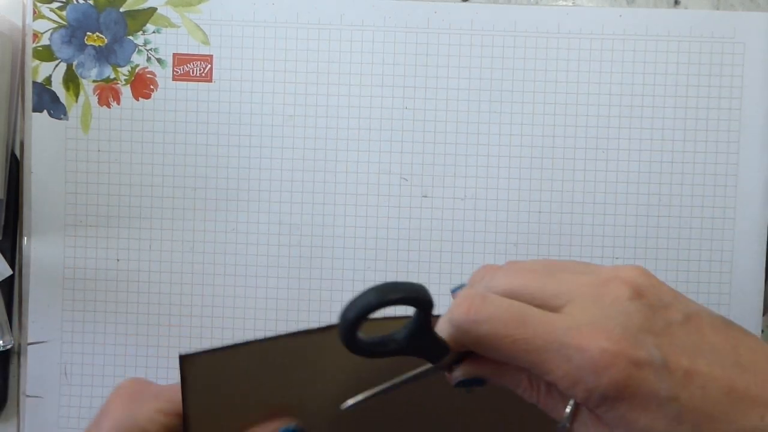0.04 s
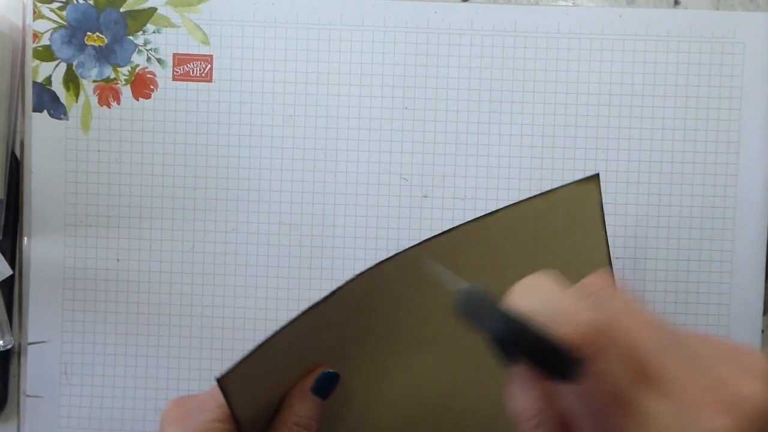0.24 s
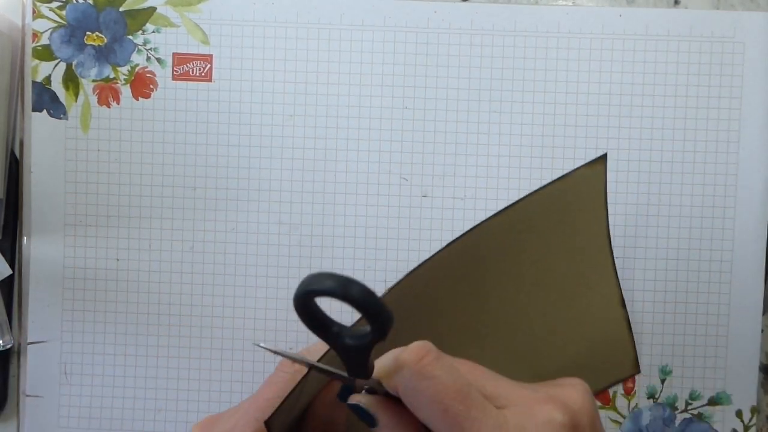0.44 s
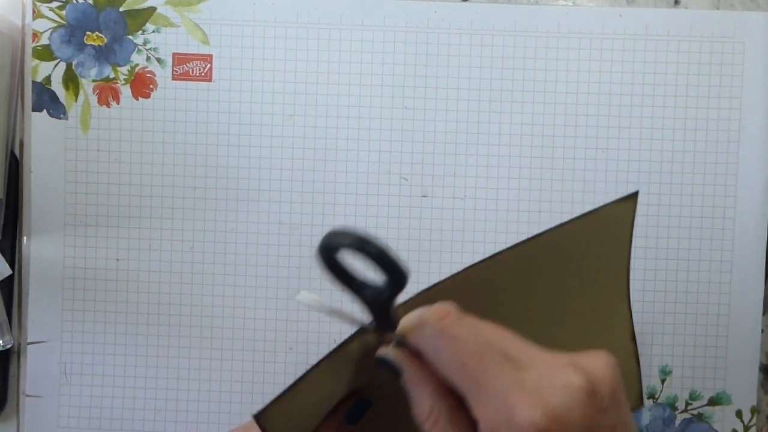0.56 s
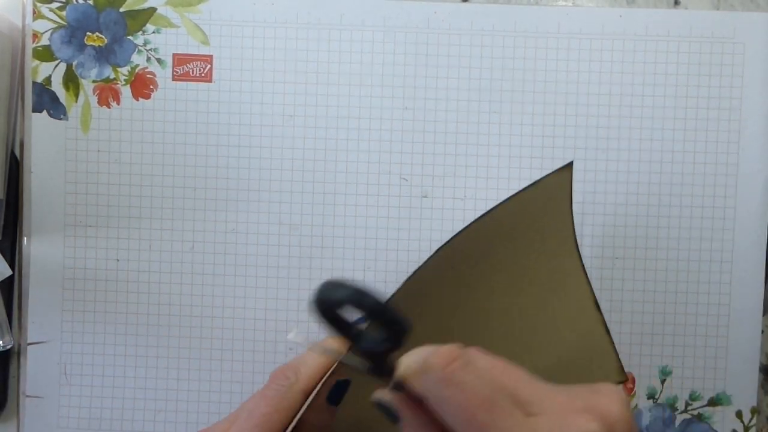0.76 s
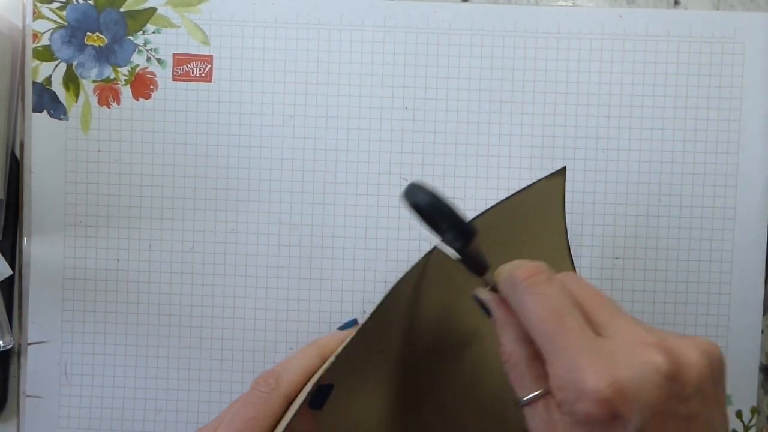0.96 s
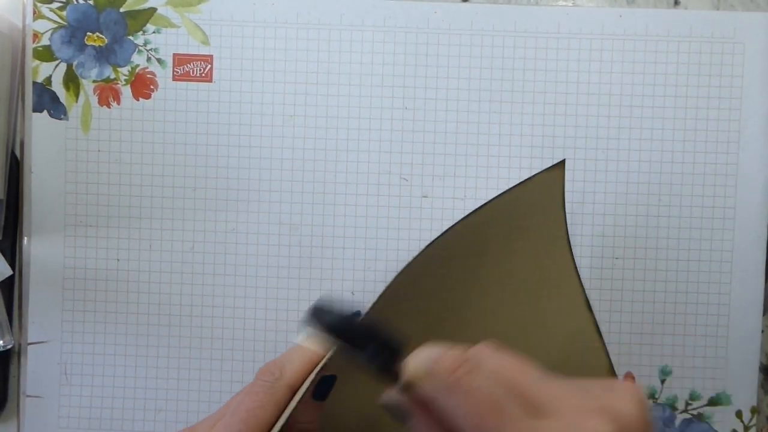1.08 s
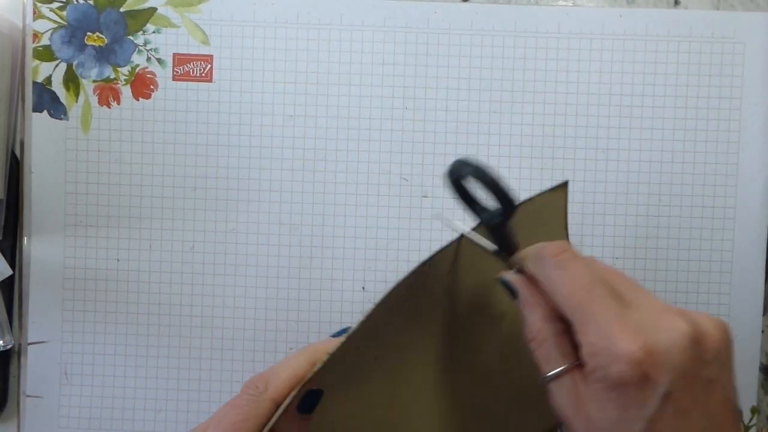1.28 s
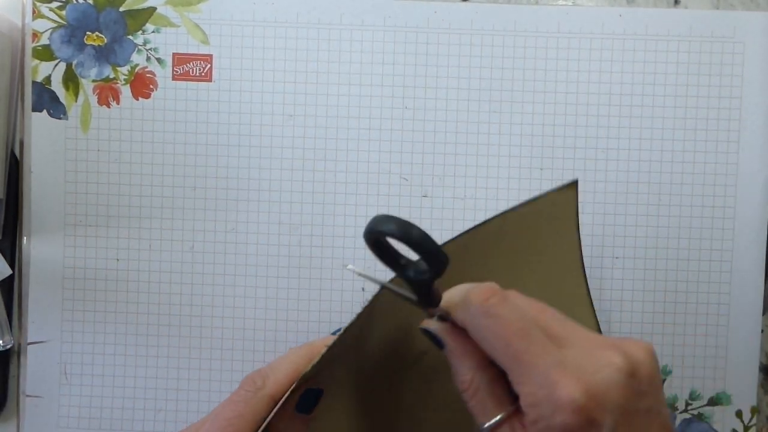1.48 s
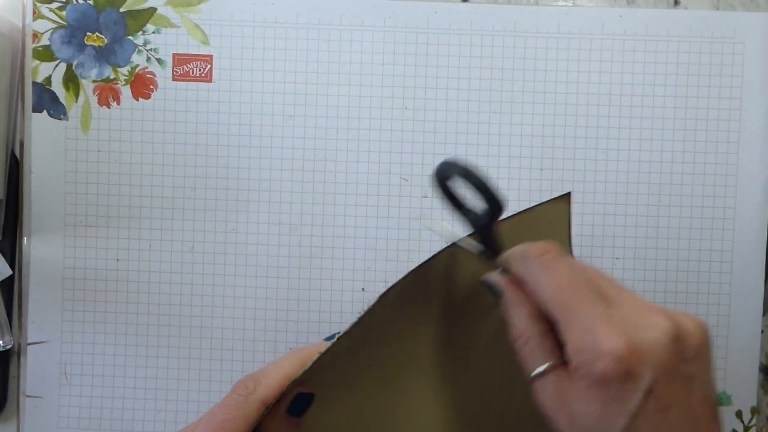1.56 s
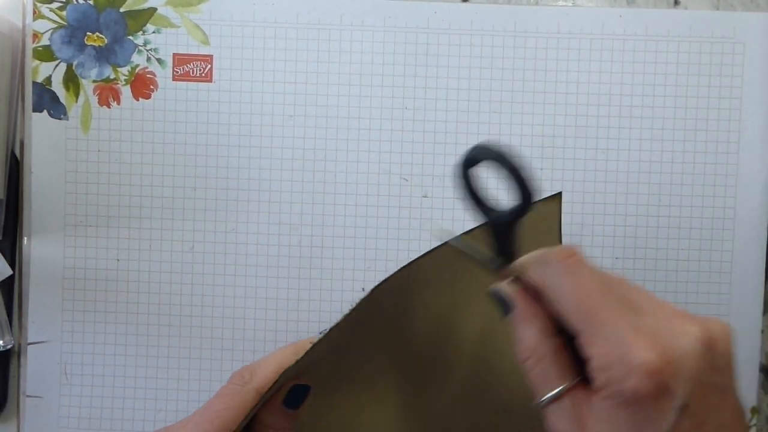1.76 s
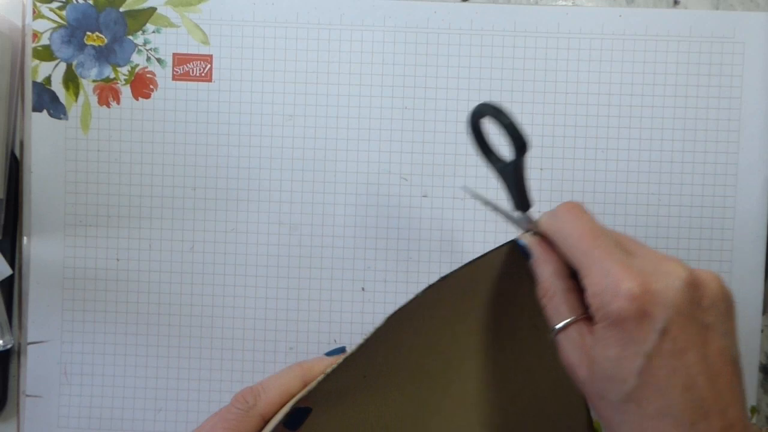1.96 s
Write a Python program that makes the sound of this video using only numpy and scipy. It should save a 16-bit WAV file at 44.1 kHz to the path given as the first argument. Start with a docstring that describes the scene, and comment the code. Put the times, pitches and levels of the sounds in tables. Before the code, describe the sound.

Raspy scrapes of a metal blade along a thick paper edge, with small knocks and faint rustling

```python
"""In a small quiet room, a sheet of cardstock rustles as it is turned in the hand, close above a desk.
Light brushes and knocks sound on it, and an open scissor blade skims its edge once.
Then come four firm strokes, about three a second, each just after a knock of the blade on the edge.
Random clicks stand for catching fibres: they hiss, and they drive resonances that are the ringing sheet.
Echoes off the desk, a short room tail and faint air noise surround it all."""
import sys
import numpy as np
from scipy import signal
from scipy.fft import rfft, irfft, next_fast_len
from scipy.io import wavfile

SR = 44100
rng = np.random.default_rng(int(sys.argv[2]) if len(sys.argv) > 2 else 0)


def dump_mix(stems):
    """Bounce the given channels to the path in sys.argv[1] as a 16-bit WAV at rate SR."""
    frames = np.atleast_2d(stems).T  # one column per channel
    limited = np.clip(frames, -1, 1)  # hard clip at full scale
    pcm = np.round(limited * 32767).astype(np.int16)
    wavfile.write(sys.argv[1], SR, pcm)


N = 89126
TIME = np.arange(N) / SR   # seconds
SIZE = next_fast_len(2 * N)   # room for filters to ring on
FREQS = np.maximum(np.arange(SIZE // 2 + 1) * SR / SIZE, 1)   # Hz

TOUCH_ARCH = 1.207   # steepness of the swell of strokes, brushes and snags
BLADE_HZ = 6500   # the steel blade's own note
LEFT_RIGHT = np.array([[1], [-1]])

# Tone of the rasping paper edge. Each row: frequency in Hz, relative level in dB per Hz.
RASP_TONE = [(60, -6), (130, -32), (190, -10), (260, -20), (420, -6), (670, -12), (800, 3), (1250, 1),
             (1900, -2.5), (2450, -3), (2950, -6), (3500, -6.5), (5000, -13.5), (9000, -37)]


def from_db(db):
    """Turn decibels into a gain."""
    return 10 ** (np.asarray(db) / 20)


def rms_one(x):
    """Scale to an average power of one."""
    return x / np.sqrt(np.mean(np.abs(x) ** 2) + 1e-20)


def colour(points):
    """Make a filter through (Hz, dB) points that never sounds before its input (minimum phase)."""
    hz, db = np.transpose(points)
    level_db = np.interp(np.log(FREQS), np.log(hz), db)
    cepstrum = irfft(np.log(from_db(level_db)), SIZE)
    # folding the second half onto the first makes the filter causal
    cepstrum[1:SIZE // 2] *= 2
    cepstrum[SIZE // 2 + 1:] = 0
    return np.exp(rfft(cepstrum))


def through(x, response):
    """Filter a sound by a frequency response."""
    return irfft(rfft(x, SIZE) * response, SIZE)[..., :N]


def butter(x, order, hz, kind="low"):
    """Cut the sound above hz, or below it for kind "high"."""
    return signal.sosfilt(signal.butter(order, hz, kind, fs=SR, output="sos"), x)


def resonance(hz, width_hz):
    """Response of one damped way of vibrating (a mode), with gain 1 at its peak."""
    return 1 / (1 + 1j * (FREQS ** 2 - hz ** 2) / (FREQS * width_hz))


def drift(hz):
    """Random wandering slower than about hz, with spread 1."""
    return rms_one(butter(rng.standard_normal(N), 2, hz))


def swell(start, crest, end, steepness):
    """An arch in time that rises from start to crest and falls to the end."""
    ramp = np.interp(TIME, [start, crest, end], [0, 1, 0])
    return np.sin(np.pi / 2 * ramp) ** steepness


def catches(per_s=5000):
    """Fibres catch and snap at random, in clumps: clicks for the middle (mid) and the width (side)."""
    spread_db = 1.5
    judder_hz, judder_db = 73, 0.99   # the blade's uneven grip
    sizes = from_db(spread_db * np.minimum(rng.exponential(1, (2, N)), 4))
    signs = rng.choice([-1, 1], (2, N))
    happens = rng.random((2, N)) < per_s / SR
    grip = from_db(judder_db * drift(judder_hz))
    return rms_one(sizes * signs * happens * grip)


def sheet(pitch):
    """The sheet's modes ring together; bending shifts them all by the ratio pitch."""
    # Each row: frequency in Hz at pitch 1, width in Hz, relative level in dB.
    sheet_modes = [(360, 23, -34), (452, 22, -5), (480, 55, 4.5), (605, 72, 2), (774, 38, 5.5),
                   (855, 69, 7), (966.5, 31, 5.5), (1135, 72, 3.5), (1201, 30, 4), (1352, 32, 7),
                   (1474, 23, 0.5), (1683, 37, -7), (1920, 87, -3.5), (2172, 43, -1.5), (2230, 21, -19),
                   (2463, 51, -7.5)]
    return rms_one(sum(from_db(db) * resonance(hz * pitch, width) for hz, width, db in sheet_modes))


def fibre_hiss():
    """Tone of snapping fibres, with the steel blade's own note added."""
    # Each row: frequency in Hz, relative level in dB per Hz.
    hiss_tone = [(400, -25), (1500, -27), (3000, 1.5), (4200, 2), (5500, -2.5), (6700, -2.5), (7600, -5),
                 (10500, 0.5), (12000, -2.5), (13200, -6), (14500, -33)]
    blade_db, blade_width_hz = 2.5, 180
    blade_note = from_db(blade_db) * resonance(BLADE_HZ, blade_width_hz)
    return rms_one(colour(hiss_tone) * (1 + blade_note))


def sliding():
    """At first the sheet rustles as it turns; later the steel sings and the sheet murmurs."""
    # A dull rustle while the sheet is turned: start, crest and end in seconds, level in dB.
    turn = (-0.02, 0.02, 0.7, -46)
    # Tone of the rustle. Each row: frequency in Hz, relative level in dB per Hz.
    rustle_tone = [(100, 1.5), (260, 7.5), (400, -3.5), (620, 4.5), (1200, -7.5), (1950, -1.5), (2500, -14),
                   (6000, -22), (11000, -17.5), (14000, -15)]
    # The blade slides back to the start of a stroke, or settles after one.
    # Each row: start, crest and end in seconds, blade level in dB, sheet level in dB.
    # A row that ends before it starts stays silent.
    returns = [(0.7, 0.75, 0.84, -48.5, -38.5), (0.825, 0.885, 0.96, -50.5, -56),
               (1.063, 1.073, 1.16, -57, -42), (1.15, 1.166, 1.24, -54.5, -60.5),
               (1.393, 1.428, 1.471, -55.5, -41), (1.75, 1.76, 1.67, -48, -41)]
    sing_width_hz = 1500
    turning = from_db(turn[3]) * swell(*turn[:3], 0.74)
    steel = sum(from_db(db) * swell(start, crest, end, 0.73) for start, crest, end, db, _ in returns)
    paper = sum(from_db(db) * swell(start, crest, end, 1) for start, crest, end, _, db in returns)
    rustle = through(turning * catches(), rms_one(colour(rustle_tone)))
    singing = through(steel * catches(), rms_one(resonance(BLADE_HZ, sing_width_hz)))
    murmur = through(paper * catches(), sheet(1))
    return rustle + singing + murmur


def brushing():
    """Light contact only rasps and hisses; brushes with few catches break up into single ticks."""
    # Light brushes of blade or fingers over the paper.
    # Each row: start, crest and end in seconds, rasp level in dB, hiss level in dB, catches per second.
    brushes = [(0, .11, 0.57, -52, -53, 1770), (0.03, 0.067, 0.087, -39, -47, 920),
               (0.15, 0.206, 0.23, -37.5, -46.5, 740), (0.484, 0.496, 0.55, -48, -46, 2550),
               (0.556, 0.561, 0.606, -41, -50, 1830), (0.586, 0.655, 0.748, -33.5, -27.5, 8000),
               (0.685, 0.687, 0.72, -31.5, -21, 2000), (1.229, 1.263, 1.275, -32, -33.5, 5100)]
    # Hiss of a light touch. Each row: frequency in Hz, relative level in dB per Hz.
    skim_tone = [(150, -26), (380, 0.5), (650, -17), (1500, -16), (3500, -1), (5500, -1), (6800, 0.5),
                 (7600, -1.5), (10500, 0.5), (12000, -2.5), (13300, -3), (14500, -18)]
    rasp = hiss = 0
    for start, crest, end, rasp_db, hiss_db, per_s in brushes:
        clicks = swell(start, crest, end, TOUCH_ARCH) * catches(per_s)
        rasp = rasp + from_db(rasp_db) * clicks
        hiss = hiss + from_db(hiss_db) * clicks
    rasp = rasp * rng.choice([-1, 1], N)   # random signs, so rasp and hiss do not match click for click
    return through(rasp, rms_one(colour(RASP_TONE))) + through(hiss, rms_one(colour(skim_tone)))


def knocks(hiss_colour):
    """A soft push and a short flutter drive the sheet, with a small bright tick."""
    # Blade or fingers knock on the sheet.
    # Each row: time in seconds, relative level in dB, softness as a cut-off in Hz, relative tick level in dB.
    knock_list = [(.017, -19, 2510, -19.5), (.084, -8, 590, -47), (0.145, -5, 1800, -6),
                  (.175, -11, 2500, -8), (.320, -29, 1980, -27), (0.456, -18, 1490, -26),
                  (0.495, -16.5, 818, -16), (0.565, -22.5, 3000, -14.5), (.760, 5.5, 1940, -19),
                  (.895, -12, 2210, -12), (1.211, -10, 2600, -16), (1.552, 3.5, 1360, -18),
                  (1.914, 8.5, 1060, -14.5), (1.934, 3, 1940, -11)]
    # Tone of the thud. Each row: frequency in Hz, relative level in dB per Hz.
    thud_tone = [(50, -9), (130, -11), (230, -5.5), (330, 0.5), (460, 9.5), (680, -1.5), (850, 3.5),
                 (1400, 1), (2400, -1), (3200, -28), (12000, -43)]
    modes_db, thud_db, all_ticks_db = -11.5, -7.5, -10.5
    flutter_db, flutter_t60_s = -20, 0.067   # the sheet quivers, falling 60 dB in this time
    soft, ticks = np.zeros((2, N)), np.zeros((2, N))
    for s, db, soft_hz, tick_db in knock_list:
        age = TIME - s
        fade = from_db(flutter_db - 60 * np.abs(age) / flutter_t60_s) * (age > 0)
        blow = fade * rng.standard_normal((2, N))
        blow[0, int(s * SR)] += 1   # the push itself, in the middle
        soft += from_db(db) * butter(blow, 2, soft_hz)
        ticks += from_db(tick_db) * blow
    body = from_db(modes_db) * sheet(0.88) + from_db(thud_db) * rms_one(colour(thud_tone))
    return through(soft, body) + through(ticks, from_db(all_ticks_db) * hiss_colour)


def snags():
    """Where the blade digs in, the sheet shudders briefly, with one mode made stronger."""
    # Each row: start, crest and end in seconds, level in dB, stressed mode in Hz.
    snag_list = [(0.704, 0.705, 0.7373, -19, 875), (1.266, 1.276, 1.304, -15, 770),
                 (1.316, 1.338, 1.362, -14.5, 817), (1.585, 1.603, 1.618, -17, 890),
                 (1.646, 1.648, 1.669, -17, 1100)]
    mode_width_hz, mode_db = 43, 1.5
    pull, all_modes = catches(), sheet(1)
    shudder = 0
    for start, crest, end, db, hz in snag_list:
        force = from_db(db) * swell(start, crest, end, TOUCH_ARCH)
        one_mode = from_db(mode_db) * rms_one(resonance(hz, mode_width_hz))
        shudder = shudder + through(force * pull, rms_one(all_modes + one_mode))
    return shudder


def scraping(hiss_colour):
    """Each firm stroke drives the sheet's modes, the bite and rasp of its edge and the hiss of the fibres."""
    # Each row: start, crest and end in seconds, levels of sheet, rasp and hiss in dB,
    # pitch of the bent sheet as a ratio, bite frequency in Hz, bite level in dB.
    strokes = [(0.916, 0.976, 1.0784, -19, -22.5, -30.5, 1.0, 2280, -27),
               (1.232, 1.319, 1.43, -17.5, -23.5, -32, .99, 2240, -25.5),
               (1.575, 1.653, 1.7656, -24, -20, -23.5, 0.97, 1160, -21.5),
               (1.928, 2.002, 2.13, -18.5, -22.5, -24, 0.99, 3650, -34.5)]
    # the edge under the blade rings early in the stroke
    bite_lead_s, bite_arch = 0.014, 1.67
    bite_width_hz = 630   # of each of two equal resonances in a row
    # the hiss needs speed, so it starts a little after the bite; its crest comes later too
    hiss_delay_s, hiss_lag_s, hiss_arch = 0.0025, 0.022, 1.4
    pull, grip, edge, fibres = catches(), catches(), catches(), catches()
    body = rasp = hiss = 0
    for start, crest, end, sheet_db, rasp_db, hiss_db, pitch, bite_hz, bite_db in strokes:
        force = swell(start, crest, end, TOUCH_ARCH)
        bite = from_db(bite_db) * swell(start, crest - bite_lead_s, end, bite_arch)
        speed = swell(start + hiss_delay_s, crest + hiss_lag_s, end, hiss_arch)
        body = body + through(from_db(sheet_db) * force * pull, sheet(pitch))
        body = body + through(bite * grip, rms_one(resonance(bite_hz, bite_width_hz) ** 2))
        rasp = rasp + from_db(rasp_db) * force
        hiss = hiss + from_db(hiss_db) * speed
    return body + through(rasp * edge, rms_one(colour(RASP_TONE))) + through(hiss * fibres, hiss_colour)


def desk(x):
    """One echo off the desk that shifts with the hand, and a brief scatter from things nearby."""
    # Each row: time in seconds, echo delay in milliseconds.
    desk_delay = [(.65, 2.16), (.99, 2.32), (1.32, 2.26), (1.66, 2.47), (1.98, 2.44)]
    echo_db, dull_hz = -16, 6900
    near_db, near_t60_s = -7, 0.025
    near_low_hz = 1390   # small things scatter only the treble
    late = TIME - np.interp(TIME, *np.transpose(desk_delay)) / 1000
    delayed = np.array([np.interp(late, TIME, channel) for channel in x])
    echo = through(delayed, 1 / (1 + 1j * FREQS / dull_hz))
    scatter = rng.standard_normal(N) * from_db(-60 * TIME / near_t60_s) * (TIME > .001)
    scatter = rfft(scatter / np.linalg.norm(scatter), SIZE)
    scatter = scatter / (1 + near_low_hz / (1j * FREQS))
    return x + from_db(echo_db) * echo + from_db(near_db) * through(x, scatter)


def place(mid, side):
    """Spread the paper over both ears; it moves towards the middle as the hand does."""
    # Level of the side sound. Each row: frequency in Hz, side against mid in dB.
    side_width = [(100, -15), (500, -20.5), (1400, -17.5), (2800, -12), (5000, -10), (12000, -8)]
    # Each row: time in seconds, dB up on the left and down on the right.
    pan = [(.6, 0.58), (2.0, 0)]
    ears = mid + through(side, colour(side_width)) * LEFT_RIGHT
    return ears * from_db(np.interp(TIME, *np.transpose(pan)) * LEFT_RIGHT)


def room(x):
    """Dense reflections, different at each ear; the treble dies first."""
    # Each row: frequency in Hz, echo level in dB.
    echo_tone = [(150, -34.5), (450, -22), (800, -21.5), (1400, -14), (3000, -13.5), (6500, -10.5),
                 (8500, -18), (13000, -13)]
    gap_s, split_hz = 0.0078, 3000
    t60_s, treble_t60_s = 0.32, 0.26   # time to fall by 60 dB
    white = rng.standard_normal((2, N)) * (TIME > gap_s)
    low = butter(white, 1, split_hz)
    tail = low * from_db(-60 * TIME / t60_s) + (white - low) * from_db(-60 * TIME / treble_t60_s)
    tail /= np.sqrt(np.sum(tail ** 2, axis=1, keepdims=True))
    return through(x, rfft(tail, SIZE) * colour(echo_tone))


def quiet_air():
    """Steady faint noise of the room, partly shared by the ears."""
    # Each row: frequency in Hz, relative level in dB per Hz.
    air_tone = [(20, -12), (45, -14), (75, -3.5), (110, -4), (220, 1), (600, 0), (1500, -1.5), (4000, -7.5),
                (12000, -15), (15000, -41)]
    level_db = -54.5
    shared, apart = rng.standard_normal(N), rng.standard_normal((2, N))   # equally strong
    return from_db(level_db) * rms_one(through(shared + apart, colour(air_tone)))


def scene():
    """Paper and blade start just left of centre, with the desk, the room and its quiet air."""
    hiss_colour = fibre_hiss()
    paper = sliding() + brushing() + knocks(hiss_colour) + snags() + scraping(hiss_colour)
    paper = butter(paper, 3, 240, "high")   # the sheet radiates little bass
    mid, side = desk(paper)
    return place(mid, side) + room(mid) + quiet_air()


def record(dry):
    """The treble rolls off and the top is cut steeply."""
    roll_off_hz, cutoff_hz = 12430, 14336
    soft = butter(dry, 8, roll_off_hz)
    return butter(soft, 16, cutoff_hz)


dry = scene()
out = record(dry)
dump_mix(out)
```